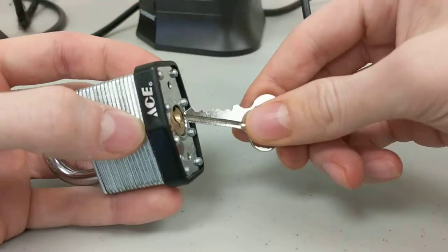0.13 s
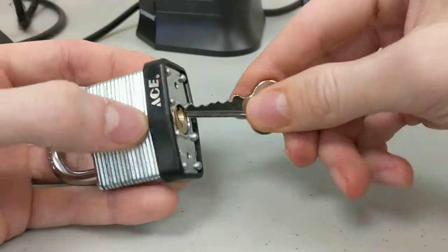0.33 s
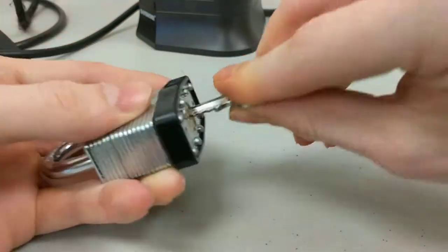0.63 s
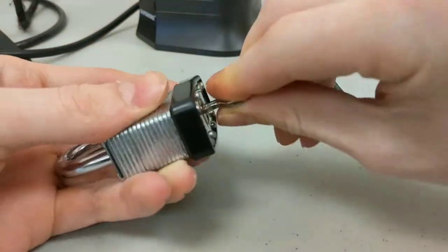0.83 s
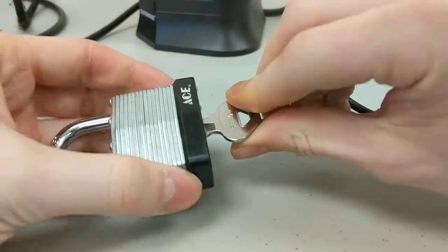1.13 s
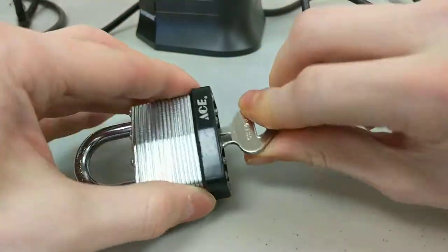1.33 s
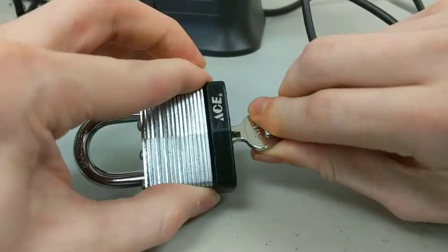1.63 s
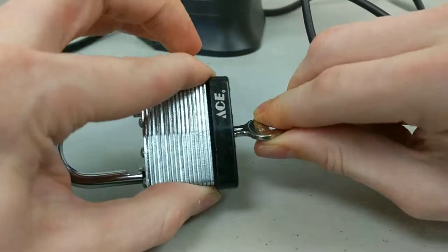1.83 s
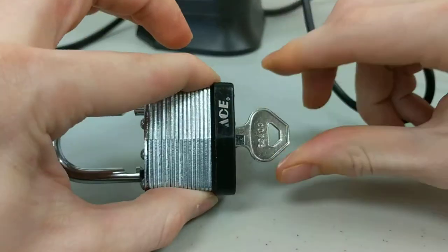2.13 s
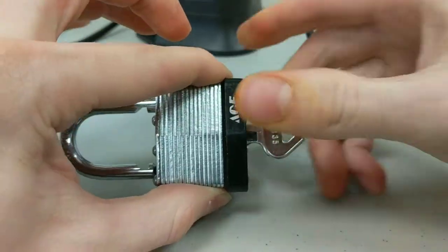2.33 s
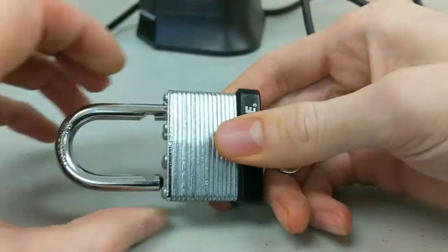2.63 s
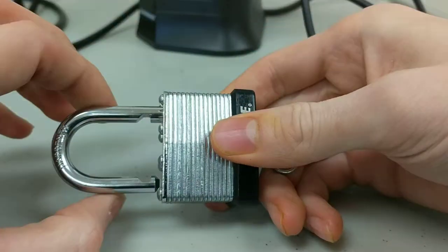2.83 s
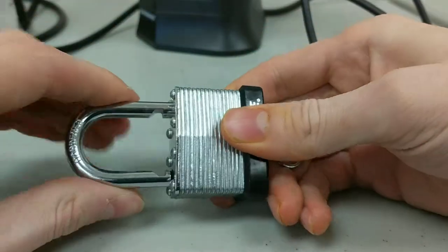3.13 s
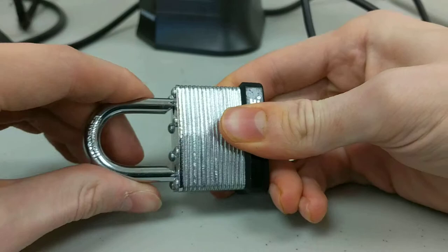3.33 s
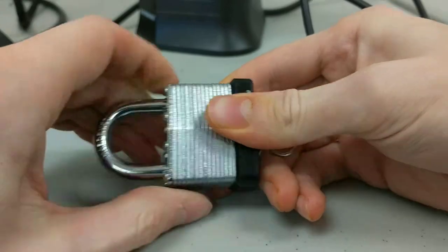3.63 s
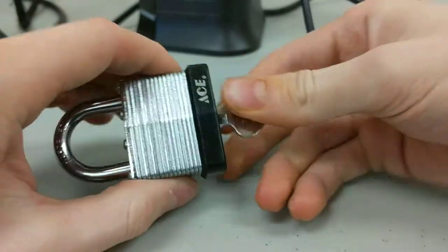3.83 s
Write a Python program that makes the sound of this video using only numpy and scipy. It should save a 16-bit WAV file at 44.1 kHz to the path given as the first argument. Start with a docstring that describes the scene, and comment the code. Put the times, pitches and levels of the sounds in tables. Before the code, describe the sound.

A padlock up close: a key rattles and scrapes in with small ticks, a loud snap as the shackle springs open, light handling ticks, then another hard snap as it shuts, in a quiet rumbling room.

```python
"""Padlock and key

Hands close to a phone push a key into a laminated padlock, turn it, the shackle springs open and is snapped shut.
Each metal tick is a short rough contact that rings the lock and the hollow under it. Skin and key rubbing on
steel, and the lock dragged over a desk, are shaped noise made of many uneven slips. Knocks are soft pushes that
ring the desk top. A faint echo follows, and a quiet room rumbles, hisses and whines."""
import sys
import numpy as np
from scipy import signal
from scipy.fft import rfft, irfft
from scipy.io import wavfile
from scipy.ndimage import uniform_filter1d

SR = 44100
rng = np.random.default_rng(int(sys.argv[2]) if len(sys.argv) > 2 else 0)


def voltage_ratio(level):
    """Linear amplitude factor for a level in decibels (scalar or array-like)."""
    return 10 ** (np.asarray(level, float) / 20)


def transcribe(u):
    """Save the signal u as a 16-bit wav file named by the first command-line argument.

    u: samples, shape (n,) or (channels, n), limited to [-1, 1]; the rate is SR.
    q: integer samples, one column per channel.
    """
    v = np.clip(np.atleast_2d(u).T, -1, 1)
    q = np.round(v * 32767).astype(np.int16)
    wavfile.write(sys.argv[1], SR, q)


N = 176400  # length [samples], 4 s

# Room noise: (frequency [Hz], relative level per Hz [dB])
ROOM_COLOUR = [(21, -33), (35, -0.5), (117, 0), (242, -11.5), (329, -17.5), (677, -28.5), (1080, -32.5),
               (10100, -48.5), (16500, -51)]
# Whines of electronics: (frequency [Hz], middle rms level [dB])
WHINES = [(2024, -90), (10320, -98), (11612, -100)]
# Lock dragged over the desk: (start [s], loudest [s], end [s], level [dB])
DRAGS = [(1.285, 1.325, 1.382, -50), (2.42, 2.46, 2.55, -52.5), (2.635, 2.655, 2.845, -53),
         (3.62, 3.67, 3.72, -41.5), (3.86, 3.866, 3.91, -47.5)]
# Sound of dragging: (frequency [Hz], relative level per Hz [dB])
DRAG_COLOUR = [(120, -6), (300, 2.5), (600, -9.5), (1200, -16.5), (2000, -16.5), (6000, -29.5),
               (12000, -45)]
# Skin and key rubbing on steel:
# (start [s], loudest [s], end [s], level [dB], hollow ring against that level [dB])
RUBS = [(-.1, .05, 0.28, -73.5, -21), (0.484, 0.492, 0.45, -70, 12), (0.582, 0.578, 0.61, -70, 15),
        (0.648, 0.737, 0.765, -51, -5.5), (1.059, 1.143, 1.22, -62.5, 4.5), (1.157, 1.29, 1.412, -64, 5),
        (1.51, 1.624, 1.72, -77.5, 11), (2.415, 2.425, 2.48, -67, 13), (2.453, 2.45, 2.49, -62.5, 12),
        (2.524, 2.71, 2.776, -58, 2.5), (3.175, 3.295, 3.7, -74, 9.5), (3.43, 3.462, 3.475, -60, 4),
        (3.545, 3.683, 3.89, -65, 4), (3.86, 3.896, 3.86, -69, 7)]
# Sound of rubbing: (frequency [Hz], relative level per Hz [dB])
RUB_COLOUR = [(1000, -33), (2500, -4), (5200, -0.5), (9000, -0.5), (14900, 1), (16000, -2)]
# Hollow sound under the rubbing: (frequency [Hz], relative level per Hz [dB])
HOLLOW_COLOUR = [(700, -30), (1300, -14), (1900, -10), (2180, 0), (2500, -10), (3600, -14), (7000, -35)]
# Knocks passed into the desk: (time [s], peak level [dB], push length [ms])
KNOCKS = [(0.758, -28.5, 12), (1.837, -25.5, 4.3), (2.451, -27, 0.52), (2.467, -33, 1.3),
          (2.651, -35, 0.38), (2.743, -38, 0.69), (3.463, -22.5, 3.9), (3.574, -34, 1.76),
          (3.666, -29.5, 0.59), (3.862, -34, 0.48)]
# Ringing tones of the desk top: (frequency [Hz], level [dB], time to fall 60 dB [s])
DESK_MODES = [(76, -1.5, 0.14), (111.4, 1, 0.15), (161, 1.5, 0.085), (307, 6, 0.047), (454, -4.5, 0.034),
              (648, -7.5, .03)]
# Ringing tones of the freed shackle: (frequency [Hz], level [dB], time to fall 60 dB [s])
SHACKLE_MODES = [(5400, 1, 1), (10600, 8, 0.56)]
# Metal contacts: (time [s], rms level over the loudest millisecond [dB],
# hollow ring against lock ring [dB], treble tilt [dB per octave])
TICKS = [(0.0923, -31.5, -5, 35), (0.1054, -32, -6.5, 13.5), (0.363, -58, 5, 0), (0.4327, -58.5, 23, -1),
         (0.4575, -56, 13, -8), (.467, -65, 17, 0), (0.4833, -53.5, 8, -8), (0.4965, -42.5, 1, -6),
         (0.5422, -51, 10, -17), (0.5694, -57, -4, -18), (0.587, -50.5, 3, -13), (0.5951, -41, 6.5, -24),
         (0.6615, -34, 1, 5), (0.6732, -40, -5, -1), (0.704, -39.5, -11.5, 0), (0.714, -41, -19, 2),
         (0.73, -32, -20, 7), (.7425, -29.5, -10.5, 3), (.7455, -34, -19, 14), (0.7509, -35.5, -6, -11),
         (0.755, -19, -10, 3), (0.856, -37.5, -5.5, -10.5), (0.94, -54, 19, -2.5), (1.2517, -45.5, 0.5, 3),
         (1.556, -51, -1, -25), (1.5968, -44.5, 1.5, -47), (1.61, -59, 6, -32), (1.63, -43.5, 1.5, -37),
         (1.6484, -48.5, 30, 0.1), (1.6643, -53, 7.5, -33), (1.6996, -49, 7.5, -8),
         (1.7772, -56.5, 13, -17), (1.8141, -39, 1.5, -37), (1.827, -30, -7.5, 3), (1.8337, -24, -13, 1),
         (1.8379, -16.5, -7, 11), (1.8376, -12, -14.5, -2.5), (1.845, -21, -14.5, -7.5),
         (1.8484, -27, -10, -2.5), (2.0018, -36.5, -5.5, -33), (2.012, -45, 4.5, -31),
         (2.0472, -34.5, -2, -25.5), (2.0597, -35, -5.5, -15), (2.068, -46, -4, 1),
         (2.4501, -43.5, 9.5, -18), (3.118, -52, -13, 41), (3.2165, -47, -1.5, 3.5),
         (3.2996, -43, -3, -2.5), (3.3734, -27.5, -3.5, 14), (3.4094, -48.5, 6, -21), (3.4406, -46, 0, 7),
         (3.452, -36.5, 5, 2), (3.457, -35, -9, 6), (3.4584, -34.5, 3, 15), (3.4617, -14, -4.5, 0),
         (3.464, -11.5, -7.5, -3), (3.5748, -45.5, 27, 0.1), (3.6378, -27, -0.5, -5), (3.7995, -56, 1, 4.5),
         (3.8614, -47, 11, -3.5), (3.901, -48, -3, -10), (3.915, -52.5, 28.5, -3)]
# Ringing tones of lock and key, before scatter: (frequency [Hz], level [dB])
LOCK_MODES = [(4160, -4), (4969, -1), (5809, 2), (6900, 1), (8102, -12), (9400, 3.5), (10300, -6),
              (12110, -0.5), (13120, -0.5), (14220, -5), (15200, -1)]
# Ringing tones of the hollow under the lock, before scatter: (frequency [Hz], level [dB])
HOLLOW_MODES = [(1000, -9), (1650, -3), (2090, 4), (2550, 6), (3400, -7)]


def unit(x):
    """Scale a sound to an rms of 1."""
    return x / np.sqrt(np.mean(x ** 2))


def colour(x, table):
    """Shape a sound's spectrum by joining (Hz, dB) points along a logarithmic pitch scale."""
    table_hz, table_db = np.array(table).T
    hz = np.maximum(np.arange(len(x) // 2 + 1) * SR / len(x), 1)
    gain = voltage_ratio(np.interp(np.log(hz), np.log(table_hz), table_db))
    return unit(irfft(rfft(x) * gain, len(x)))


def walk(rate_hz):
    """Wander at random around zero: levels held for 1 / rate_hz seconds, then smoothed twice."""
    hold = int(SR / rate_hz)
    levels = np.repeat(rng.standard_normal(N // hold + 1), hold)
    smooth = uniform_filter1d(uniform_filter1d(levels, hold), hold)
    return 0.96 * smooth[:N]


def decay(t, t60_s):
    """Fade that falls 60 dB in t60_s seconds."""
    return np.exp(-np.log(1000) * t / t60_s)


def ring(modes, t60_s, size, chance=np.zeros((2, 16)), tilt_db=0):
    """Fading tones of a struck object; the chance numbers change their levels and pitches."""
    scatter_db, scatter_hz_share = 3, 0.035
    hz, db = np.array(modes).T[:2, :, None]
    db_chance, hz_chance = chance[:, :len(modes), None]
    db = db + scatter_db * db_chance + tilt_db * np.log2(hz / 9000)
    hz = hz * (1 + scatter_hz_share * hz_chance)
    t = np.arange(size) / SR
    return np.sum(voltage_ratio(db) * decay(t, t60_s) * np.sin(2 * np.pi * hz * t), axis=0)


def add(out, start_s, x):
    """Mix x into out from start_s on."""
    i = int(start_s * SR)
    out[i:i + len(x)] += x[:N - i]


def strokes(rows):
    """Loudness of hand movements: each swells to its loudest moment and fades."""
    t = np.arange(N) / SR
    total = np.zeros(N)
    for start, loudest, end, db in rows:
        # keep at least a few milliseconds for the swell and the fade
        times = [start, max(start + 0.002, loudest), max(loudest + 0.004, end)]
        swell = np.interp(t, times, [0, 1, 0])
        total += voltage_ratio(db) * np.sin(np.pi / 2 * swell) ** 1.28
    return total


def friction(gain, table, grain_db, flutter_db, rate_hz):
    """Dense slips of uneven size, coloured; treble and the rest flutter apart (flutter_db scales the walks)."""
    slips = rng.standard_normal(N) * voltage_ratio(grain_db * rng.exponential(size=N))
    rubbing = colour(slips, table)
    split = signal.butter(2, 7000, fs=SR, output="sos")  # split at 7000 Hz
    low = signal.sosfiltfilt(split, rubbing)
    high = rubbing - low
    low_flutter = voltage_ratio(flutter_db * walk(rate_hz))
    high_flutter = voltage_ratio(flutter_db * walk(rate_hz))
    return gain * (low_flutter * low + high_flutter * high)


def room():
    """Ventilation rumble and hiss as coloured noise, plus faint wavering sine whines."""
    t = np.arange(N) / SR
    room_db = -52.5  # middle level, wavers slowly
    sound = colour(rng.standard_normal(N), ROOM_COLOUR) * voltage_ratio(room_db + 0.64 * walk(10.37))
    for hz, db in WHINES:
        level = np.sqrt(2) * voltage_ratio(db + 1.5 * walk(8.8))  # a sine peaks at root 2 times its rms
        sound += level * np.sin(2 * np.pi * hz * t)
    return sound


def echo(near):
    """Room echo: the near sounds smeared by a fading burst of noise."""
    t60_s, start_s, echo_db = 0.5, 0.004, -30
    t = np.arange(SR // 2) / SR
    tail = rng.standard_normal(len(t)) * decay(t, t60_s) * (t > start_s)
    tail = tail / np.sqrt(np.sum(tail ** 2))
    return voltage_ratio(echo_db) * signal.fftconvolve(near, tail)[:N]


def drags():
    """The lock slides over the desk in many small slips."""
    return friction(strokes(DRAGS), DRAG_COLOUR, grain_db=1.94, flutter_db=4.6, rate_hz=150)


def hollow_rubs():
    """The hollow sound that goes along with each rub."""
    rows = [(start, loudest, end, db + hollow_db) for start, loudest, end, db, hollow_db in RUBS]
    return friction(strokes(rows), HOLLOW_COLOUR, grain_db=2.5, flutter_db=0.9, rate_hz=81)


def rubs():
    """Skin and key rub on steel in many small slips."""
    rows = [row[:4] for row in RUBS]
    return friction(strokes(rows), RUB_COLOUR, grain_db=1.5, flutter_db=3.0, rate_hz=40)


def knocks():
    """Soft pushes ring the desk top; longer pushes are duller."""
    slap_db = -4  # the contact itself, against the peak of the ring
    out = np.zeros(N)
    desk = ring(DESK_MODES, np.array(DESK_MODES)[:, 2:], size=9000)
    for start, db, length_ms in KNOCKS:
        push = np.hanning(int(length_ms * SR / 1000) + 3)
        knock = signal.fftconvolve(push, desk)
        knock[:len(push)] -= voltage_ratio(slap_db) * abs(knock).max() * push
        add(out, start, voltage_ratio(db) * knock / abs(knock).max())
    return out


def shackle():
    """The freed shackle sings faintly; random swings of its strength make it rattle loose."""
    free_s, gain_db, rattle_hz, size = 1.846, -61, 1500, 15000
    song = ring(SHACKLE_MODES, np.array(SHACKLE_MODES)[:, 2:], size=size)
    out = np.zeros(N)
    add(out, free_s, voltage_ratio(gain_db) * walk(rattle_hz)[:size] * song)
    return out


def loudest_ms(x):
    """Scale a sound so that its loudest millisecond has an rms of 1."""
    return x / np.sqrt(uniform_filter1d(x ** 2, size=SR // 1000).max())


def contact_force():
    """Two rough pushes that rise fast, die away and chatter on after the blow."""
    rise_ms, contact_ms, chatter_ms = 0.68, 1.0, 5.04  # time constants
    chatter_db, grit_db = -22.5, 3
    ms = np.arange(900) / SR * 1000
    grit = voltage_ratio(grit_db * rng.exponential(size=len(ms)))
    fade = np.exp(-ms / contact_ms) + voltage_ratio(chatter_db) * np.exp(-ms / chatter_ms)
    rise = 1 - np.exp(-ms / rise_ms)
    return rng.standard_normal((2, len(ms))) * grit * fade * rise


def ticks():
    """Short rough contacts ring the lock and its hollow, with a broadband crack on top."""
    lock_t60_s, hollow_t60_s, crack_db = 0.005, 0.006, -3
    pad = np.hanning(int(0.25 * SR / 1000) + 3)  # the hollow feels the contact rounded off, over about 0.25 ms
    out = np.zeros(N)
    for start, db, hollow_db, tilt_db in TICKS:
        force = contact_force()
        # each contact point weights and detunes the tones anew
        lock_chance, hollow_chance = rng.standard_normal((2, 2, 16))
        jolt = np.diff(force[0])  # small parts radiate no bass
        lock = ring(LOCK_MODES, lock_t60_s, size=1500, chance=lock_chance, tilt_db=tilt_db)
        high = loudest_ms(signal.fftconvolve(jolt, lock))
        crack = loudest_ms(np.diff(force[1]))
        high[1:len(crack) + 1] += voltage_ratio(crack_db) * crack
        hollow = ring(HOLLOW_MODES, hollow_t60_s, size=1500, chance=hollow_chance)
        low = loudest_ms(signal.fftconvolve(np.convolve(jolt, pad, "same"), hollow))
        add(out, start, voltage_ratio(db) * loudest_ms(high + voltage_ratio(hollow_db) * low))
    return out


def scene():
    """Near sources, their echo, and the room."""
    near = drags() + hollow_rubs() + rubs() + knocks() + shackle() + ticks()
    return (near + echo(near) + room())[None]


def roll_off(x):
    """The treble ends steeply here."""
    return signal.sosfilt(signal.butter(12, 17140, fs=SR, output="sos"), x)


def record(dry):
    """The phone cuts the deepest bass (below 45.4 Hz) and the top (above 16000 Hz)."""
    bass_cut = signal.butter(2, 45.4, "high", fs=SR, output="sos")
    top_cut = signal.ellip(8, 0.2, 60, 16000, fs=SR, output="sos")
    mix = signal.sosfilt(top_cut, signal.sosfilt(bass_cut, dry))
    return roll_off(mix)


dry = scene()
out = record(dry)
transcribe(out)
```